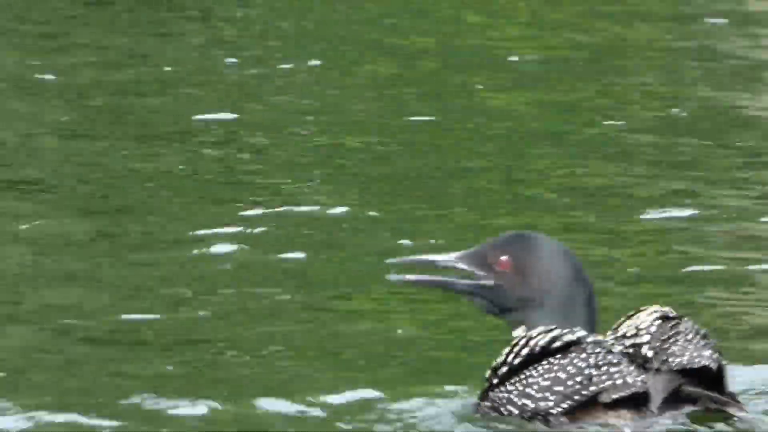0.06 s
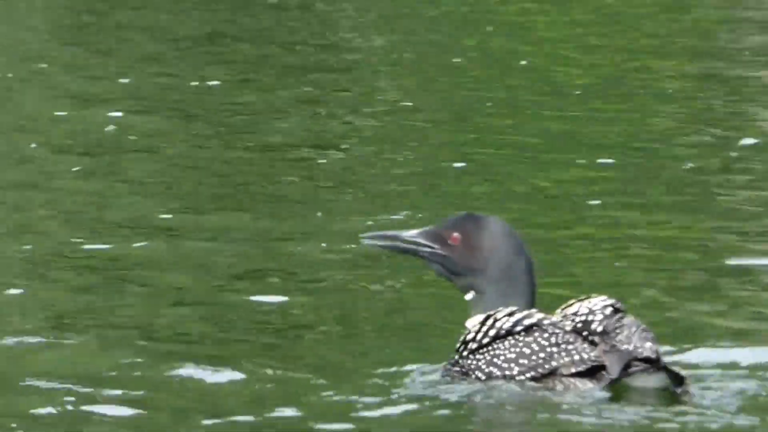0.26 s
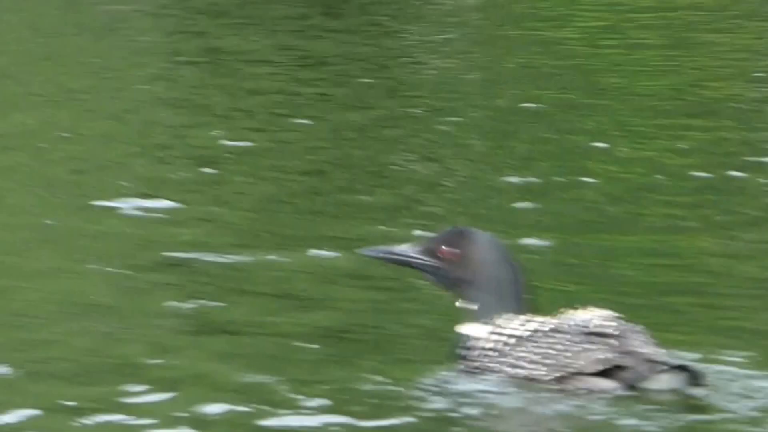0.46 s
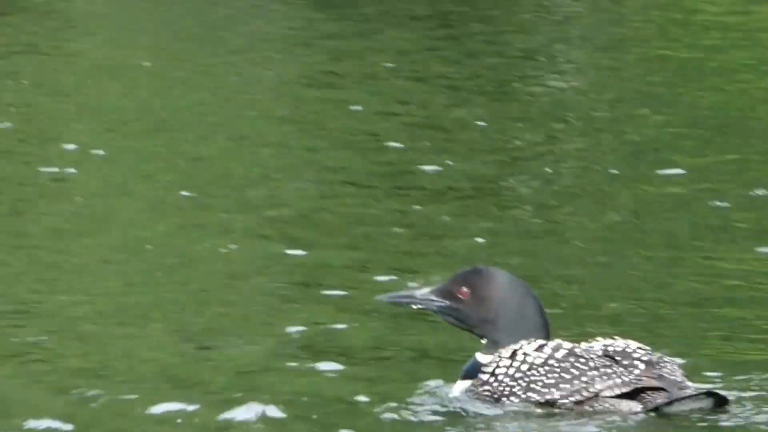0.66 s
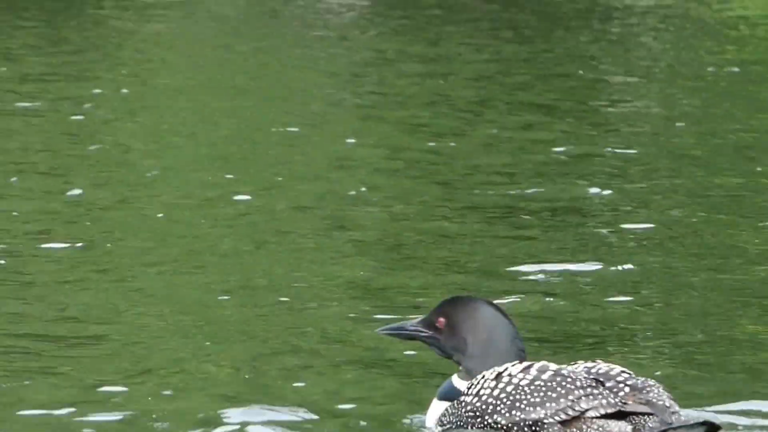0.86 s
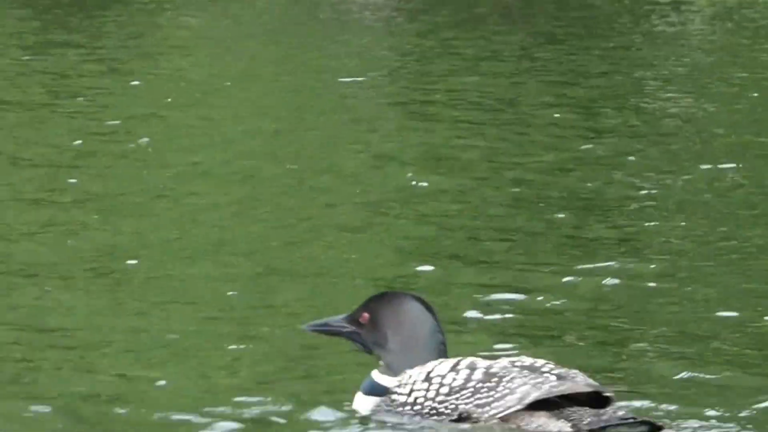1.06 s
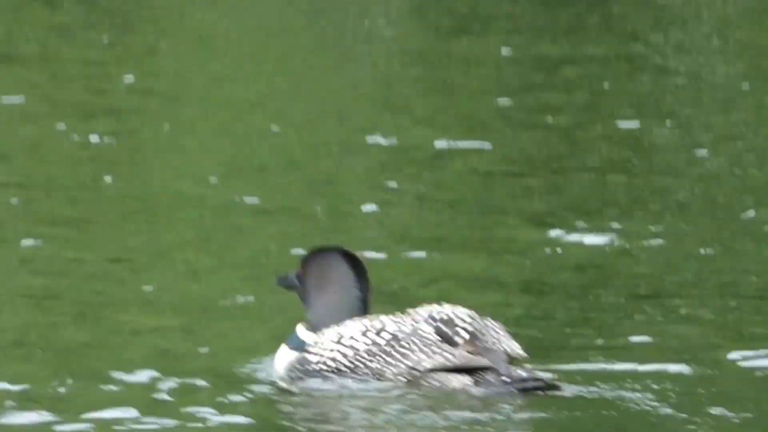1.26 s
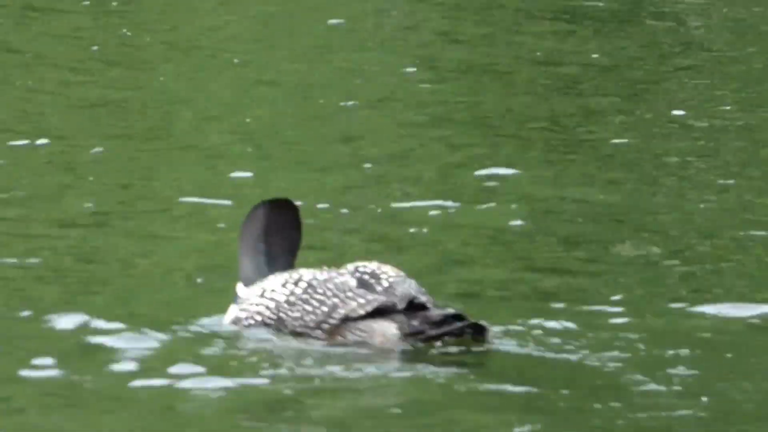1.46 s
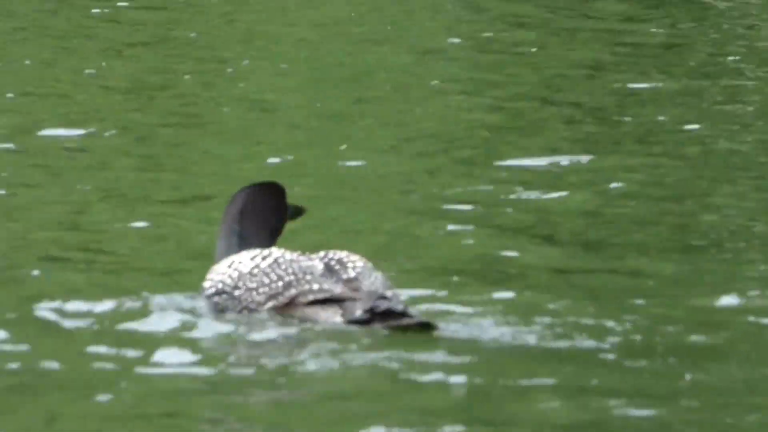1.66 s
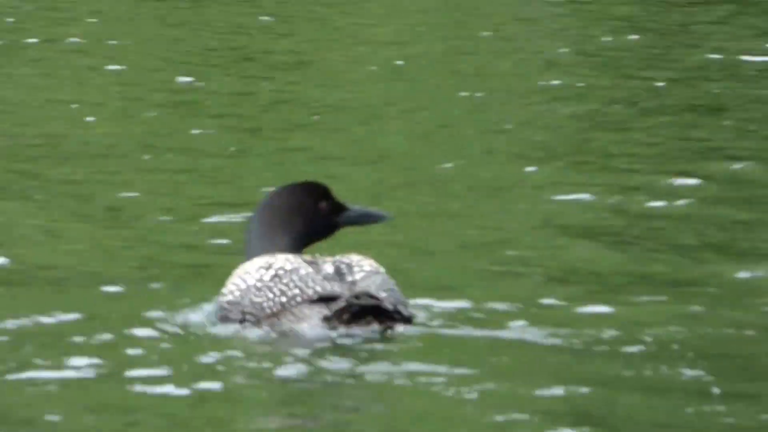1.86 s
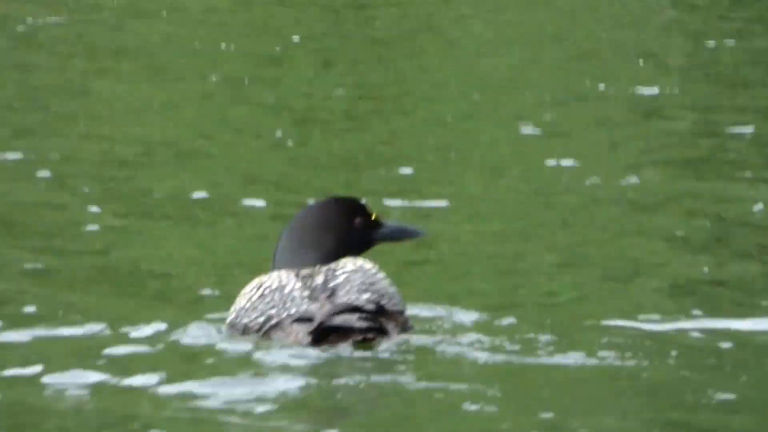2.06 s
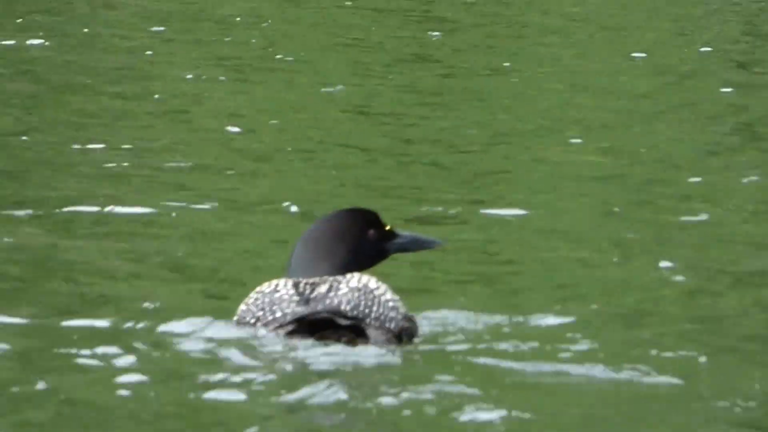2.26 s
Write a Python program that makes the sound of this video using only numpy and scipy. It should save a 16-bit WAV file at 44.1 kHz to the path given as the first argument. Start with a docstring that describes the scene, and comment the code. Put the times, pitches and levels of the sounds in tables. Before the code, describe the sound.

One brief, quavering loon hoot on a quiet pond, followed by small drips and plops.

```python
"""A low wind rumble and a thin hiss, probably a camera's zoom motor, hang over a rippling pond.
After a soft plop, a loon gives one short tremolo call: a hoot whose pitch wavers four times,
brighter on each crest. The hiss stops as the call ends, and the wooded shore answers faintly.
Then water drips and plops: drops tick on the surface and set small bubbles ringing."""
import sys
import numpy as np
from scipy import signal
from scipy.fft import rfft, irfft, next_fast_len
from scipy.io import wavfile
from scipy.ndimage import uniform_filter1d, map_coordinates

SR = 44100
rng = np.random.default_rng(int(sys.argv[2]) if len(sys.argv) > 2 else 0)


def wrap_up_sound(samples):
    """Save the sound to the file named by the first command line argument, as 16-bit audio."""
    columns = np.atleast_2d(samples).T
    # keep every value between -1 and 1, then stretch to whole-number steps
    tamed = np.clip(columns, -1, 1)
    steps = np.round(tamed * 32767).astype(np.int16)
    wavfile.write(sys.argv[1], SR, steps)


N = 101429
T = np.arange(N) / SR

# how alike a noise is in the two ears: f/Hz, likeness (1 = the same)
EAR_LIKENESS = [(30, 0.96), (70, 0.79), (150, 0.99), (300, 0.99), (800, 0.3), (2000, 0.27), (6000, 0.49),
                (13000, 0.4)]


def amp(db):
    """Turn decibels into a gain."""
    return 10 ** (np.asarray(db) / 20)


def along(points, hz):
    """Read between (f/Hz, value) points on a log frequency axis."""
    freqs, values = np.transpose(points)
    return np.interp(np.log(hz + 1), np.log(freqs + 1), values)


def curves(rows):
    """One smooth curve over time for each column after the first."""
    times, *columns = np.transpose(rows)
    return [uniform_filter1d(np.interp(T, times, column), size=260) for column in columns]


def wobble(rate):
    """A smooth curve through `rate` random values a second."""
    return map_coordinates(rng.standard_normal(4000), [T * rate], mode="wrap")


def filtered(x, response):
    """Scale each frequency in x by the gain response(hz)."""
    size = next_fast_len(N + SR // 2)
    return irfft(rfft(x, size) * response(np.fft.rfftfreq(size, 1 / SR)), size)[..., :N]


def pan(db):
    """Left and right gains that make the left louder by db."""
    return amp(np.array([[.5], [-.5]]) * db)


def rush(spectrum, likeness):
    """Stereo noise with the given tone colour, at an average (rms) level of 1."""
    def response(hz):
        angle = np.arccos(np.clip(along(likeness, hz), -1, 1)) / 2
        return amp(along(spectrum, hz)) * [np.cos(angle), np.sin(angle)]
    mid, side = filtered(rng.standard_normal((2, N)), response)
    noise = np.array([mid + side, mid - side])
    return noise / np.sqrt(np.mean(noise ** 2))


def outdoors():
    """Wind rumbles, ripples swell and fade, the air hisses and a distant drone wavers."""
    # tone colours of the wind, the ripples and the air: f/Hz, relative level/dB
    wind_colour = [(15, -55), (25, -25.5), (86, -10.5), (120, -6.5), (145, -0.5), (164, -1), (179, -5.5),
                   (202, -2.5), (244, -1), (286, -5), (358, -0.5), (391, -4.5), (525, -6.5), (706, -13),
                   (757, -23.5), (966, -15), (1600, -36), (2080, -53), (3520, -120)]
    ripple_colour = [(300, -29), (550, -7), (800, 6.5), (1000, -10), (1200, -9), (1500, -19.5), (2100, -21),
                     (3000, -33.5), (6000, -50)]
    air_colour = [(1000, -3), (1500, 0), (2100, -2), (2600, -7), (3300, -8.5), (4300, -3.5), (6500, -5.5),
                  (9400, -9.5), (15500, -12)]
    # rise and fall of the ripples: t/s, level/dB
    ripple_levels = [(0, -67.5), (.8, -62), (1.02, -54.5), (1.18, -57), (1.35, -66), (1.53, -60.5),
                     (1.7, -63), (1.95, -54.5), (2.08, -65), (2.22, -61.5), (2.3, -63)]
    # tones of the drone: f/Hz, level/dB
    drone_tones = [(95, -70.5), (153.5, -68.5)]
    wind = amp(-54.5 + .28 * wobble(7)) * rush(wind_colour, EAR_LIKENESS)
    ripples = amp(curves(ripple_levels)[0] + 2 * wobble(12)) * rush(ripple_colour, EAR_LIKENESS)
    drone = 0
    for hz, db in drone_tones:
        strength = np.sqrt(2) * amp(db + 3.5 * wobble(8.4))
        drone += strength * np.sin(2 * np.pi * hz * T + 2.4 * wobble(8))
    air = amp(-67.5) * rush(air_colour, EAR_LIKENESS)
    return pan(-1) * (wind + ripples + drone + air)


def zoom_motor(stop_s=.56, fade_s=.008):
    """A small motor makes a steady, thin hiss that dies quickly as it stops."""
    # tone colour of the motor: f/Hz, relative level/dB
    motor_colour = [(590, -32), (1000, 2), (1080, -3.5), (1260, -10.5), (1490, -12), (1880, -10),
                    (2130, -22.5), (2390, -7.5), (2560, -22.5), (2770, -20), (3110, -30), (4440, -18.5),
                    (4870, -9), (6480, -20), (8060, -16.5), (8640, -8), (10000, -24.5), (12800, -22),
                    (15500, -21)]
    running = np.clip((stop_s - T) / fade_s, 0, 1)
    return amp(-59) * running * rush(motor_colour, likeness=[(1000, .31)])


def plops():
    """Large air pockets in the water swell and ring with a low, hollow note."""
    # air pockets: t/s, f/Hz, level/dB, swell/s, time to fade 60 dB/s, left minus right/dB
    pockets = [(0.044, 536, -48, .008, 0.18, 2), (.957, 603, -46.5, 0.0078, 0.046, -10),
               (1.803, 592, -38, 0.001, 0.047, -4), (1.8035, 1140, -50, 0.0023, 0.031, 15),
               (1.813, 561.3, -36.5, 0.014, .11, -1.5), (2.243, 760, -53, 0.00067, 0.019, -24),
               (2.2444, 1270, -54.5, 0.0022, .025, 9)]
    sound, t = np.zeros((2, N + SR)), T[:SR // 6]
    for start, hz, db, swell, fade, pan_db in pockets:
        shape = np.minimum(t / swell, 1) * amp(db - 60 * np.maximum(t - swell, 0) / fade)
        onset = round(start * SR)
        sound[:, onset:onset + len(t)] += pan(pan_db) * shape * np.sin(2 * np.pi * hz * t)
    return sound[:, :N]


def swing(points, arch=1.7):
    """Glide from trough to crest and back; arch 1 gives pointed troughs, 2 gives round ones."""
    times, values = np.transpose(points)
    index = np.arange(len(times))
    position = np.interp(T, times, index)
    height, step = np.abs(np.sin(np.pi * position / 2)) ** arch, np.floor(position)
    return np.interp(step + np.where(step % 2, 1 - height, height), index, values)


def loon(attack_s=.0055, release_s=.015, split_hz=4350):
    """The bird hoots a pure note and its octave; its throat colours the weak higher harmonics."""
    # troughs and crests of the pitch: t/s, f/Hz
    pitch_turns = [(.172, 635), (.213, 716.3), (.259, 641.3), (.303, 740.8), (.355, 623.4), (.399, 705.3),
                   (.453, 594), (.496, 616.4), (.562, 527)]
    # harmonics (multiples of the pitch) 1 to 3: t/s, first/dB, second/dB, third before its trim/dB
    hoot_levels = [(0.176, -31.5, -66, -72), (0.188, -39, -67, -63), (0.212, -29, -35, -52.5),
                   (0.23, -26, -33.5, -50.5), (0.256, -19, -42.5, -69), (0.27, -23, -40.5, -60),
                   (0.292, -20, -28, -57), (0.314, -17.5, -27, -52), (0.33, -21.5, -36, -53),
                   (0.352, -20.5, -37.5, -68), (0.368, -22, -41, -72), (0.386, -22.5, -31, -53),
                   (0.404, -23.5, -30, -47.5), (0.424, -20.5, -30.5, -52), (0.458, -24, -45.5, -75),
                   (0.492, -23, -28.5, -54), (0.508, -23.5, -32, -54), (0.532, -26, -35.5, -84),
                   (0.554, -38.5, -62, -64), (0.566, -54.5, -82.5, -88)]
    # higher harmonics: t/s, level below split_hz/dB, level above it/dB
    treble_levels = [(0.18, -67.5, -65), (0.22, -60.5, -55.5), (0.242, -43.5, -50), (0.26, -49, -55),
                     (0.298, -54.5, -50.5), (0.31, -56.5, -54), (0.328, -42.5, -51.5), (0.336, -42.5, -57),
                     (0.374, -51, -58), (0.384, -52, -49), (0.402, -50.5, -59), (0.42, -44, -50.5),
                     (0.436, -45, -59), (0.462, -61.5, -57), (0.482, -40.5, -81), (0.508, -41.5, -65.5),
                     (0.534, -70.5, -84), (0.545, -76, -80)]
    # resonances of the throat: f/Hz, relative level/dB
    throat_colour = [(2400, -19), (2600, -22), (2850, -14), (3020, 0), (3120, 0), (3300, -7), (3520, -11),
                     (3720, -3), (3850, -3), (4100, 3), (4350, 0), (4650, -3), (5050, -12), (5450, -7),
                     (5900, -9), (6300, -21), (6600, -14), (6850, -19), (7150, -10), (7550, -21),
                     (8000, -14), (8500, -25), (10500, -19), (12000, -25), (15000, -36)]
    # balance of the voice between the ears: f/Hz, left minus right/dB
    balance = [(650, -1.5), (1350, 1.5), (3000, 3), (4500, 4), (9000, -1)]
    hz = swing(pitch_turns)
    first_db, second_db, third_db = curves(hoot_levels)
    treble_db, top_db = curves(treble_levels)
    phase = 2 * np.pi * np.cumsum(hz * (1 + .0016 * wobble(350))) / SR  # slightly unsteady pitch
    hoot = amp(first_db) * np.cos(phase) + amp(second_db) * np.cos(2 * phase + 1)
    hoot += amp(third_db - 2.5) * np.cos(3 * phase)

    harmonics = np.arange(4, 21)[:, None]
    high = 1 / (1 + (split_hz / (harmonics * hz)) ** 40)  # 0 below the split, 1 above
    flicker_db = (5 + high) * np.array([wobble(54) for _ in harmonics])
    throat = amp(along(throat_colour, harmonics * hz) + flicker_db)
    bands = [(treble_db, throat * (1 - high)), (top_db, throat * high)]
    gains = sum(amp(db) * band / np.linalg.norm(band, axis=0) for db, band in bands)
    treble = np.sum(gains * np.cos(harmonics * phase + harmonics ** 2), axis=0)

    puffs = (1 + np.cos(phase)) / 2  # one puff of noise per vibration
    rasp = amp(treble_db - 16) * rush(throat_colour, EAR_LIKENESS) * puffs
    fade_in = np.clip((T - hoot_levels[0][0]) / attack_s, 0, 1)
    fade_out = np.clip((hoot_levels[-1][0] - T) / release_s + 1, 0, 1)
    voice = np.sqrt(2) * fade_in * fade_out * (hoot + treble + rasp)
    return filtered(voice, lambda f: pan(along(balance, f)))


def scatter(x, fades, delay_s=0):
    """Blur x into a stereo echo; fades lists f/Hz, time to fade 60 dB/s."""
    hz, t, noise = signal.stft(rng.standard_normal((3, SR)), SR, nperseg=256)
    tails = signal.istft(noise * amp(-60 * t / along(fades, hz)[:, None]), SR, nperseg=256)[1]
    tails = tails[:2] * .5 + tails[2]  # both ears share the third tail
    tails = np.pad(tails / np.linalg.norm(tails[0]), ((0, 0), (round(delay_s * SR), 0)))
    return signal.fftconvolve(x, tails, axes=1)[:, :N]


def shore(x):
    """Sound lingers in the trees, returns late from the far bank and bounces quickly off the water."""
    # echo among the trees: f/Hz, time to fade 60 dB/s
    tree_fades = [(600, 1.63), (1400, 1.84), (4000, 0.88), (10000, 0.44)]
    # tone colours of the shore's echo and of the mostly treble bounce off ripples: f/Hz, gain/dB
    far_colour = [(550, -2.5), (720, 3), (1150, -2), (1420, 2), (3000, -10.5), (8000, -6)]
    near_colour = [(700, -17), (1450, -15), (3000, -1), (9000, 3)]
    trees = amp(-32.5) * scatter(x, tree_fades)
    bank = amp(-35.5) * scatter(x, fades=[(1000, .54)], delay_s=.29)
    surface = amp(-11) * scatter(x, fades=[(1000, .025)])
    far = filtered(trees + bank, lambda hz: amp(along(far_colour, hz)))
    return far + filtered(surface, lambda hz: amp(along(near_colour, hz)))


def drips(attack_s=.00027, tick_fade_s=.0072):
    """Each drop ticks on the surface and rings a small bubble whose pitch slides."""
    # drops: t/s, f/Hz, ring level/dB, time to fade 60 dB/s, slide/(octaves a second),
    # tick level before colouring/dB, left minus right/dB
    drops = [(0.832, 7140, -51, 0.014, -13, -52.5, -10), (.936, 8560, -56, 0.0089, 11, -72, 7),
             (0.986, 4000, -63, 0.056, 34, -59, 6), (1.014, 4970, -56.5, 0.061, -12, -57, -4),
             (1.055, 1930, -58, .04, 22, -58.5, 2), (1.148, 4070, -58, 0.012, -4, -50.5, -1),
             (1.228, 6830, -55.5, 0.013, 0, -61, 7), (1.243, 1960, -56, 0.029, 3, -66, 1),
             (1.5707, 4170, -42, 0.011, -9, -59, -3), (1.645, 1846, -60, 0.066, -1, -72, 5),
             (1.692, 4010, -51.5, 0.02, -9, -70, -1.5), (1.724, 9750, -53, 0.0071, 10, -64, 0),
             (1.8016, 3870, -47, 0.015, 5, -54, 6), (1.8075, 3950, -52.5, 0.011, 2, -68, 1),
             (1.821, 2100, -53, 0.011, 1, -64, 7), (1.998, 2130, -55, .035, 29, -61.5, 5),
             (2.009, 3760, -56, 0.015, 45, -80, 8), (2.018, 7060, -50, 0.0025, 12, -50, 6.5),
             (2.086, 5200, -51, 0.0056, 10, -51.5, -3), (2.149, 8400, -57, 0.027, 8, -59, -5),
             (2.1583, 4950, -49, 0.0058, 12, -48, -9.5), (2.243, 1850, -45.5, 0.0086, -8, -56, 6.5)]
    # tone colour of the ticks: f/Hz, gain/dB
    tick_colour = [(300, -4), (1500, -14), (3000, -15), (5000, 5.5), (8000, 0), (11000, -2), (15000, -19)]
    rings, ticks = np.zeros((2, 2, N + SR))
    t = T[:SR // 6]
    for start, hz, db, fade, slide, tick_db, pan_db in drops:
        drift, noise = rng.standard_normal((2, len(t)))
        pitch = hz * 2 ** np.minimum(slide * t, 1)
        phase = np.cumsum(2 * np.pi * pitch / SR + .074 * drift)  # drift roughens the note
        ring = amp(db - 60 * t / fade) * (1 - np.exp(-t / attack_s)) * np.sin(phase)
        tick = amp(tick_db - 60 * t / tick_fade_s) * noise
        onset = round(start * SR)
        rings[:, onset:onset + len(t)] += pan(pan_db) * ring
        ticks[:, onset:onset + len(t)] += pan(pan_db) * tick
    return rings[:, :N] + filtered(ticks[:, :N], lambda f: amp(along(tick_colour, f)))


def scene():
    """Water and bird with their echo, over the outdoor background and the motor."""
    pond = plops() + loon() + drips()
    return pond + shore(pond) + outdoors() + zoom_motor()


def record(dry, top_hz=15750):
    """Cut away the very highest treble."""
    return filtered(dry, lambda hz: hz < top_hz)


dry = scene()
out = record(dry)
wrap_up_sound(out)
```